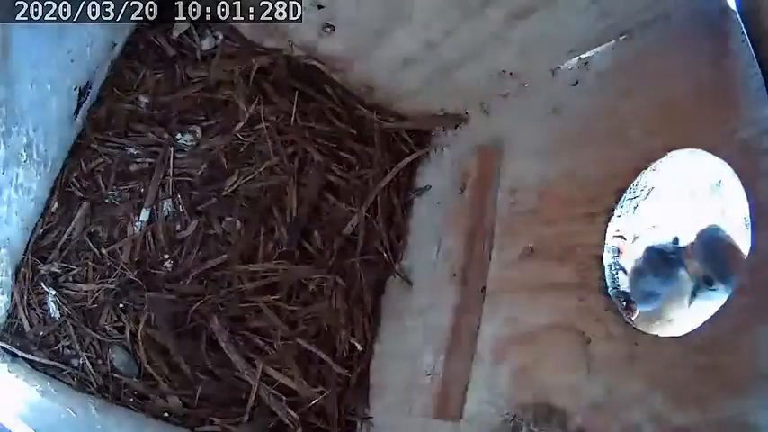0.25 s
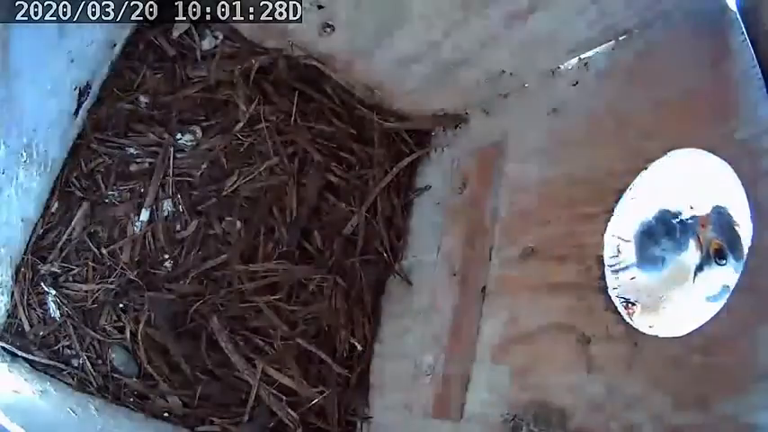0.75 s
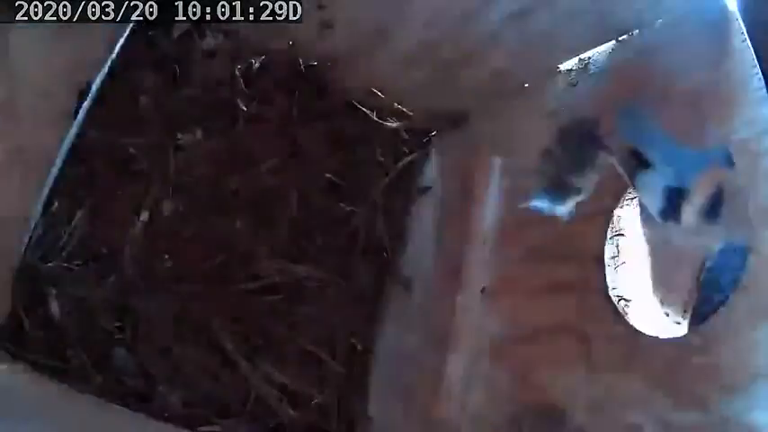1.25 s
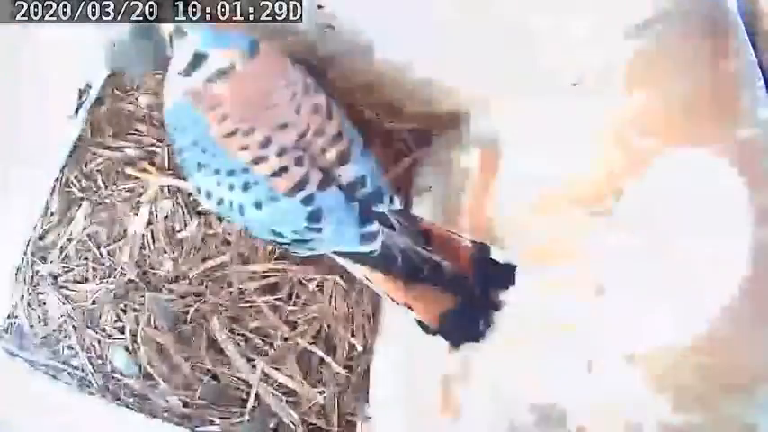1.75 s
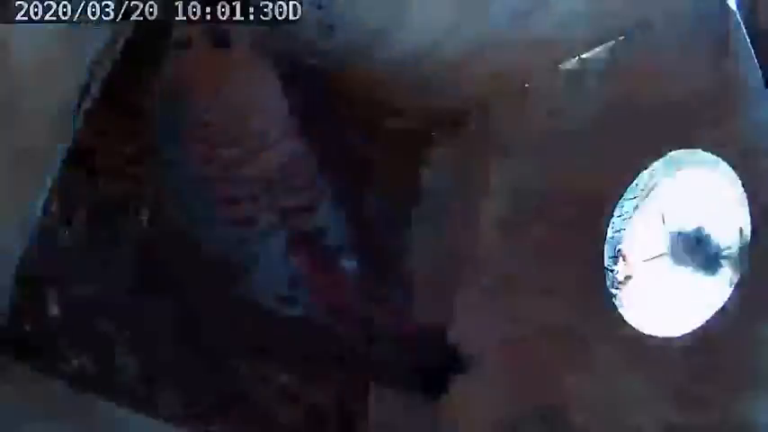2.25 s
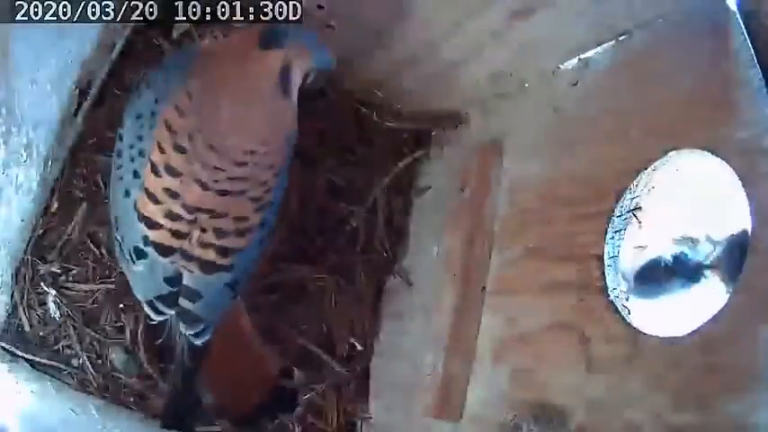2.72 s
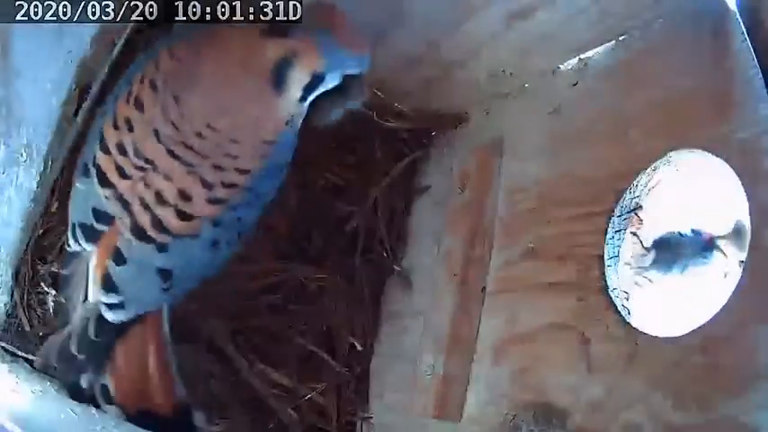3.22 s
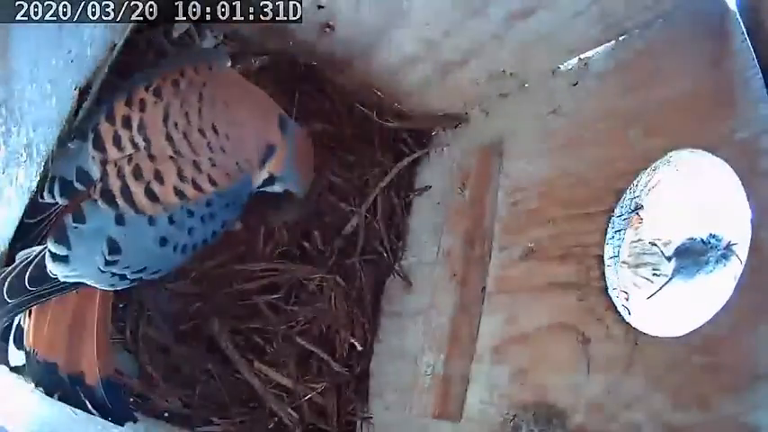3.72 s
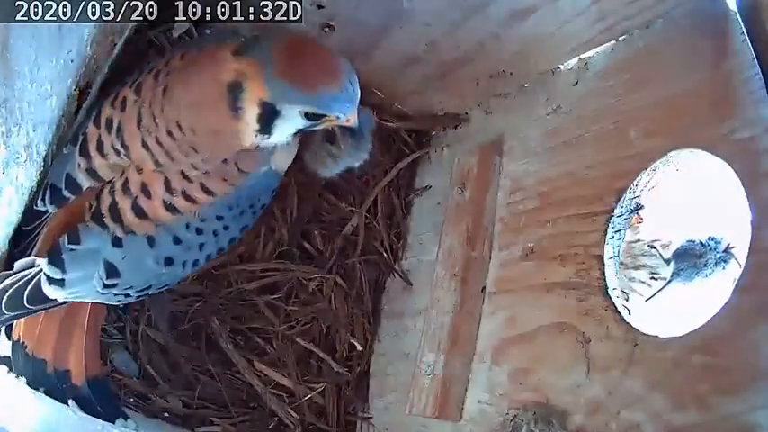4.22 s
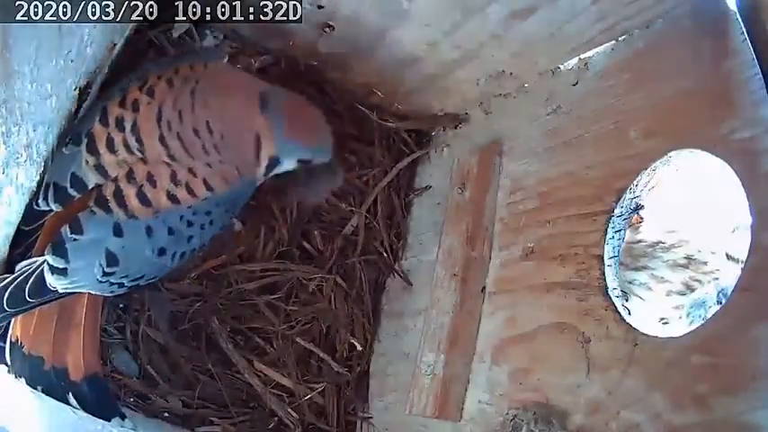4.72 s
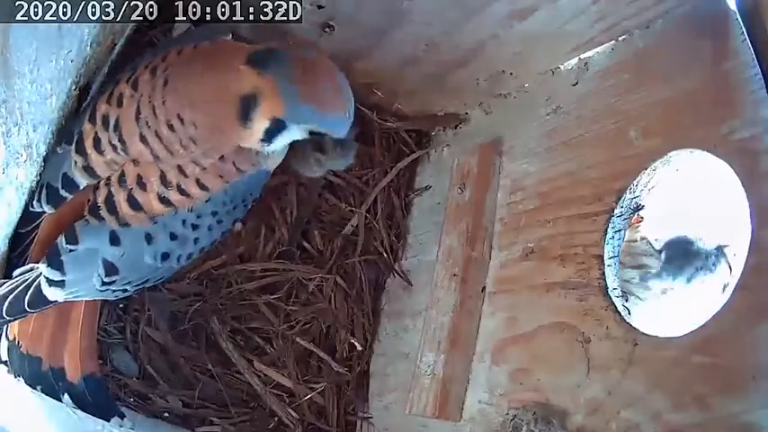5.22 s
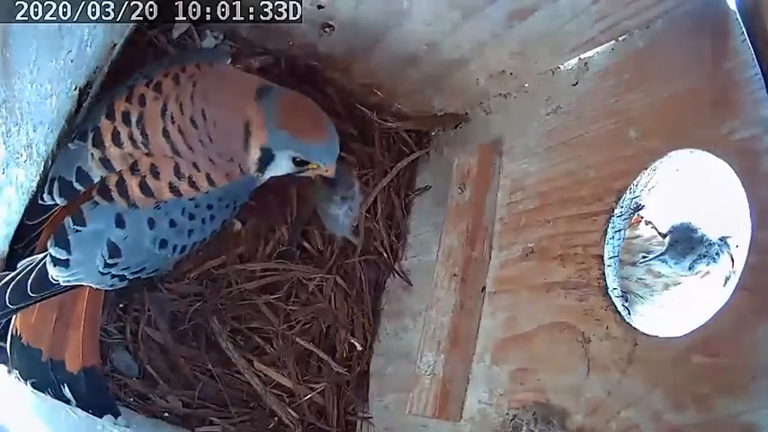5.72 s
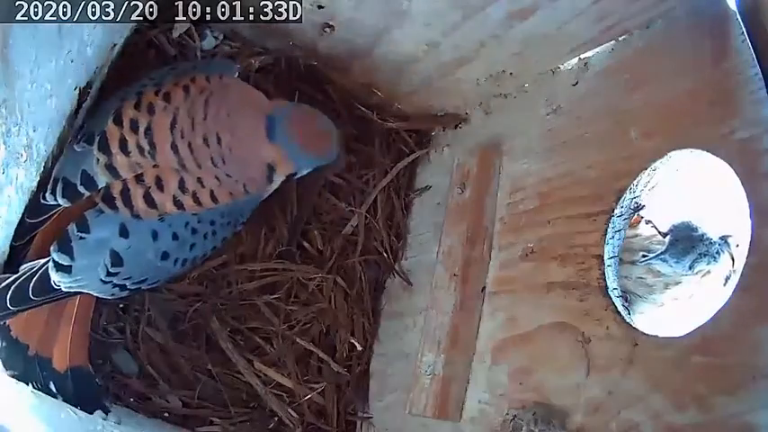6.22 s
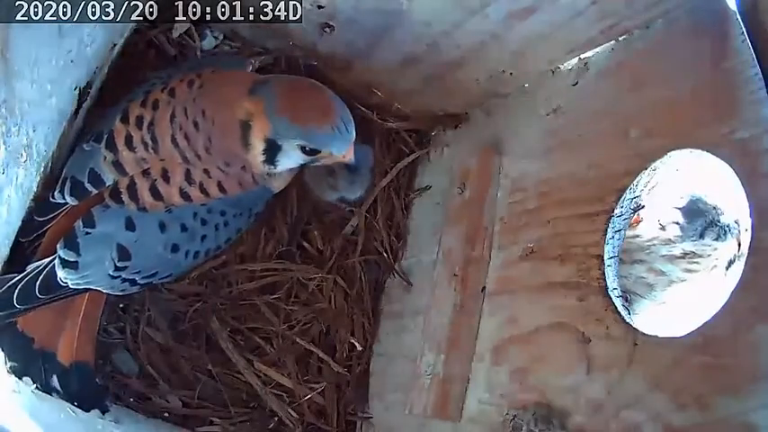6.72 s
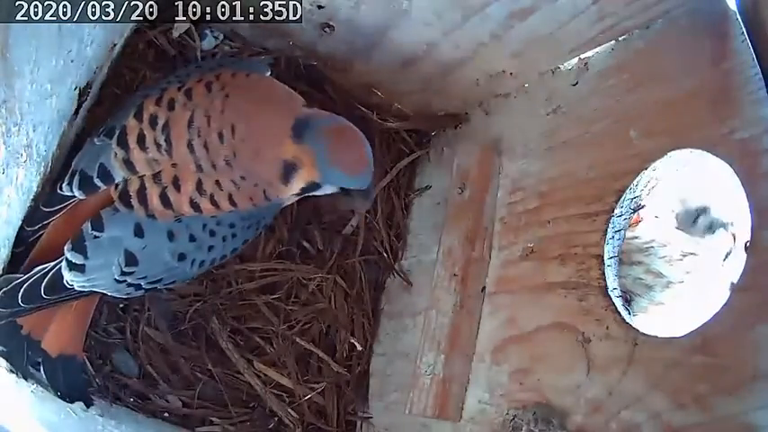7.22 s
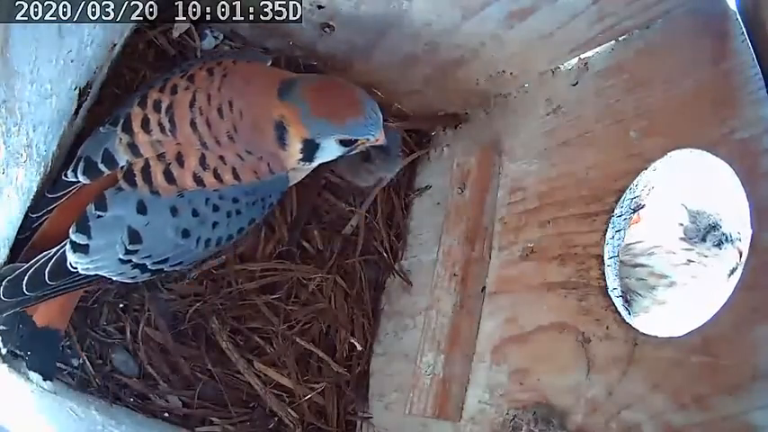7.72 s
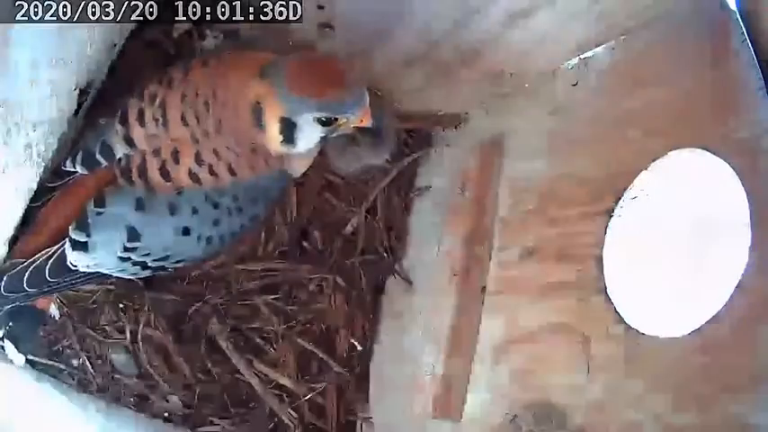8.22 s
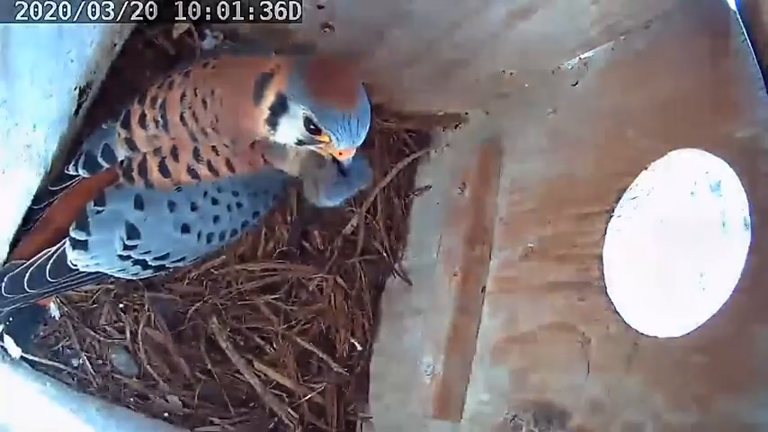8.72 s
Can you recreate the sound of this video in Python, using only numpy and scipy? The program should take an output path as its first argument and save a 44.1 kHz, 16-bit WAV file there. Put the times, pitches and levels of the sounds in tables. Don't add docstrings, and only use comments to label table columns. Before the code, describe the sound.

Two small falcons chatter harshly at a hollow wooden nest box, rapid trills overloading the microphone, with claw scratches over a low hum and hiss.

```python
import sys
import numpy as np
from scipy import signal
from scipy.fft import rfft, irfft
from scipy.io import wavfile
from scipy.ndimage import uniform_filter1d, map_coordinates

SR = 44100
rng = np.random.default_rng(int(sys.argv[2]) if len(sys.argv) > 2 else 0)


def transcribe(signal):
    frames = np.atleast_2d(signal).T
    limited = np.clip(frames, -1, 1)
    pcm = np.round(limited * 32767).astype(np.int16)
    wavfile.write(sys.argv[1], SR, pcm)


def nominal_scale(level):
    x = np.asarray(level, float) / 20
    return 10 ** x


N = 395120

# time in seconds, pitch of the 4th order in Hz,
# its level in dB, engine load as 5th over 4th order in dB.
ENGINE = [(0, 140, -39, 6.5), (.7, 140, -47, 4.5), (1.9, 135, -41, -3.5), (2.2, 136, -23, 5.5),
          (2.55, 137, -36.5, 4.5), (3.5, 141, -30.5, -8), (4.2, 143, -36.5, -9), (4.9, 139, -31.5, -2),
          (5.3, 133, -39, 4), (6.1, 139, -40.5, -16), (6.8, 136, -41.5, -12), (7.3, 139, -35, -24),
          (8.96, 142, -43.5, -5)]
# frequency in Hz, density in dB per Hz.
RUMBLE_COLOUR = [(30, -20.5), (65, -22), (90, -9.5), (200, -8.5), (235, -33), (400, -57.5)]
# time in seconds, level in dB.
RUMBLE_LEVEL = [(0, -38.5), (.7, -51.5), (2.25, -38), (3.8, -54.5), (4.9, -50.5), (6.1, -51), (8.96, -42)]
# frequency in Hz, density in dB per Hz.
HISS_COLOUR = [(150, -27), (260, -9), (417, -5), (556, -6), (795, -7.5), (1830, -17), (3290, -19),
               (8000, -18), (10400, -60.5), (17600, -120)]
# time in seconds, level in dB.
HISS_LEVEL = [(2.6, -46.5), (4, -55.5), (4.6, -50), (5.0, -63), (5.5, -54), (7, -52), (8.96, -53)]
# time in seconds, brightness of the upper harmonics in dB.
BEAK = [(0.1, -0.5), (0.8, -2), (1.15, 0.5), (1.8, -2), (2.1, -7.5), (2.4, 7.5), (2.75, -10.5), (3.0, 3.5),
        (3.4, -9.5), (3.62, 2.5), (3.9, 6), (4.8, 7), (5.4, -0.5), (5.72, 8), (6.24, 0), (6.39, 10),
        (7.33, -1.5), (8.5, 1)]
VOICE_HARMONICS = [-25.5, -2, -2, -0.5]
# time in seconds, level in dB.
MATE_PULSES = [(0.0354, -14), (0.0768, -9), (0.1133, -6.5), (0.155, -3.5), (0.1982, -3), (0.238, -5.5),
               (0.2754, -5), (0.3214, -3.5), (0.3644, -7.5), (0.4054, -5), (0.453, -6), (0.4982, -6),
               (0.5434, -6.5), (0.592, -7), (.64, -12.5), (0.6851, -9), (0.7373, -9), (0.7948, -1.5),
               (0.8439, -1.5), (0.8999, -3.5), (.9439, -5), (0.9939, -3), (1.0437, -1), (1.081, -1),
               (1.1261, -4), (1.1743, -14.5)]
# start in seconds, level in dB, length in seconds, pitch in Hz.
STRAY_NOTES = [
    (0.0909, -17, .016, 2230),
    (2.9373, -7, .014, 2000),
    (3.3588, -7.5, 0.0099, 2060),
    (3.4062, -13.5, .008, 1944),
    (4.0037, -18, 0.0065, 2070),
    (7.5732, -12.5, .006, 2250),
    (0.8272, -7.5, .006, 2055),
]
# start in seconds, peak in dB, time to die by 60 dB in seconds.
SCRATCHES = [(0.086, -10.5, 0.61), (1.535, -27, 0.54), (1.55, -10.5, 0.041), (1.629, -21, 0.2),
             (2.221, -19.5, 0.087), (2.259, -13, 0.12), (4.399, -32, 0.17), (4.888, -53, 0.036),
             (8.047, -21, 0.1), (8.214, -10, 0.048), (8.373, -20.5, 0.17), (8.408, -29, .12),
             (8.872, -26, 0.025), (8.885, -55, 0.071)]
# frequency in Hz, level in dB.
BOARDS = [(300, 10), (900, 1.5), (1700, -6.5), (3000, -5), (5000, -4.5), (7500, -1)]
# start in seconds, end in seconds, level in dB.
FOOT_SHIFTS = [
    (1.175, 1.247, -43.5),
    (2.3, 2.7, -37),
    (8.281, 8.45, -41),
    (8.78, 8.96, -47),
]
# frequency in Hz, density in dB per Hz.
LITTER_COLOUR = [(150, -12), (260, 3), (600, -4.5), (1100, -8.5), (1400, -27)]
# time in seconds, peak in dB.
OUTSIDE_PULSES = [(1.2964, -37), (1.3339, -34), (1.3543, -46), (1.3826, -33), (1.4072, -34), (1.432, -36.5),
                  (1.4551, -37), (1.479, -33), (1.5105, -25.5)]
# opening tick in seconds, number of pulses,
# first gap in seconds, lateness of the last pulse in seconds.
TRILL_RHYTHM = [
    (1.6709, 12, .0356, .0545),
    (2.3467, 7, .0352, .0074),
    (3.5958, 10, .0349, .0323),
    (4.4713, 10, .0333, .0347),
    (5.3663, 11, .0348, .0355),
    (6.2268, 5, .0304, .0216),
    (7.3134, 6, .0334, .017),
    (8.4628, 6, .0366, .01),
]
# first pulse in dB, last pulse in dB, first pitch in Hz, last pitch in Hz.
TRILL_TONE = [(-2, -11, 2350, 1800), (1.5, -6, 2300, 2100), (3.5, -10.5, 2080, 1920), (-1, -9, 2090, 2000),
              (-1.5, -15.5, 2050, 1950), (-4, -5, 2050, 2200), (0, -10, 2050, 1950), (1, -15, 1920, 1880)]
# length in seconds, rise in Hz.
OPENING_TICKS = [(.013, 150), (.006, 100), (.005, 100), (.007, 100), (.007, 140), (.007, 100), (.007, 100),
                 (0.014, 250)]
# start in seconds, number of pairs, first gap in seconds,
# lateness of the last pair in seconds.
CHATTER_RUNS = [
    (2.6161, 12, .0356, .0013),
    (3.0552, 9, .0361, .0396),
    (3.4551, 2, .0494, 0),
]
# time in seconds, level in dB.
CHATTER_EFFORT = [(2.62, -6.5), (2.66, -11), (2.77, -14), (2.85, -6.5), (2.92, -8.5), (3.01, 2), (3.13, -5),
                  (3.3, -13), (3.51, -15.5)]
# time in seconds, pitch in Hz, level in dB.
CLEAR_WHISTLES = [
    [(4.85, 1876, -25.5), (4.955, 1914, -26), (4.992, 1884, -36), (5.015, 1967, -28), (5.028, 1867, -22.5),
     (5.06, 1950, -41)],
    [(5.093, 1930, -22), (5.102, 1840, -19), (5.118, 1850, -29), (5.13, 1920, -24), (5.145, 1780, -36)],
    [(5.312, 1932, -36), (5.32, 2092, -24), (5.345, 2098, -55)],
    [(7.908, 1880, -39.5), (7.917, 1845, -30), (7.93, 1800, -56)],
]
# time in seconds, pitch in Hz, level in dB.
THIN_WARBLE = [
    [(7.99, 3030, -44), (8.022, 3250, -45), (8.06, 3120, -45), (8.1, 3120, -48)],
    [(8.11, 3400, -39), (8.125, 3350, -36.5), (8.17, 3090, -54), (8.21, 3200, -52), (8.245, 3070, -56),
     (8.258, 2930, -23.5), (8.272, 2700, -65)],
]
# start in seconds, end in seconds.
CLEANER_SPANS = [
    (0.649, .97),
    (3.421, 3.6),
]
# start in seconds, end in seconds.
PACKET_GAP = (7.684, 7.798)

UP, DOWN, CAMERA_SR = 441, 160, 16000
TICK_S, LONG_S = .0065, .021
GLIDE_HZ = 110


def in_time(rows):
    s, *columns = np.transpose(rows)
    return [np.interp(np.arange(N) / SR, s, c) for c in columns]


def drift(rate_hz):
    lowpass = signal.butter(2, rate_hz, fs=SR / 20, output="sos")
    slow = signal.sosfilt(lowpass, rng.standard_normal(N // 20 + 2))
    return np.interp(np.arange(N) / 20, np.arange(len(slow)), slow / slow.std())


def coloured(points):
    hz, db = np.transpose(points)
    grid = np.maximum(np.fft.rfftfreq(N, 1 / SR), 1)
    gain = nominal_scale(np.interp(np.log(grid), np.log(hz), db))
    x = irfft(rfft(rng.standard_normal(N)) * gain, N)
    return x / x.std()


def hum():
    hz, fourth_db, load_db = in_time(ENGINE)
    rumble_db, = in_time(RUMBLE_LEVEL)
    turn = 2 * np.pi * np.cumsum(hz * (1 + 0.0089 * drift(8))) / 4 / SR
    tones = np.zeros(N)
    for order, db in [(3, fourth_db - 12), (4, fourth_db), (5, fourth_db + load_db)]:
        tones += np.sqrt(2) * nominal_scale(db + 2.5 * drift(6)) * np.sin(order * turn)
    return tones + nominal_scale(rumble_db + 9.5) * coloured(RUMBLE_COLOUR)


def hiss():
    level_db, = in_time(HISS_LEVEL)
    return nominal_scale(level_db + drift(12)) * coloured(HISS_COLOUR)


def tick(s, db, hz):
    glide = .7 * (hz - 2020)
    return s, db + 0.45 * max(db + 11.0, 0), .0055, hz - glide, hz + glide


def close_pulse(s, db, length, start_hz, end_hz):
    return s + .001, db + 2.5, .88 * length, start_hz, end_hz


def mate():
    notes = []
    for s, db in MATE_PULSES:
        grace_db = -10 + 0.43 * (db + 3) + rng.uniform(-0.13, 1)
        notes.append(tick(s - .0205, grace_db, 2091))
        end_hz = (.96 + .015 * rng.standard_normal()) * 2072
        notes.append((s, db + 1.5, .9 * .0115, 1.12 * 2072, end_hz))
    return notes


def bird_voice(notes, rise_s=.0015, fall_s=0.0028):
    level, pitch = np.zeros(N), np.full(N, 2000.)
    for s, db, length, start_hz, end_hz in sorted(notes):
        t = np.arange(-rise_s, length + 8 * fall_s, 1 / SR)
        attack = np.clip(t / rise_s + 1, 0, 3) / 3
        shape = attack * np.exp(-np.maximum(t - length + fall_s, 0) / fall_s)
        i = max(round((s - rise_s) * SR), 0)
        level[i:i + len(t)] = np.maximum(level[i:i + len(t)], nominal_scale(db + 2.0) * shape)
        sag = .07 * length / .02 * (np.sin(np.pi * np.clip(t / length, 0, 1)) - .6)
        glide = np.interp(t, [.1 * length, .9 * length], [start_hz, end_hz])
        pitch[i:i + len(t)] = (1 - sag) * glide
    phase = 2 * np.pi * np.cumsum(pitch * (1 + .025 * drift(150))) / SR

    bright_db, = in_time(BEAK)
    stack, power = np.zeros(N), np.zeros(N)
    for k, (db, share) in enumerate(zip(VOICE_HARMONICS, [-1.4, -0.73, -.3, 1.0])):
        gain = nominal_scale(db + share * bright_db + 5.5 * drift(90))
        stack += gain * np.sin((k + 1) * phase + k)
        power += gain ** 2
    stack *= np.sqrt(2 / power)

    breath = signal.butter(2, [2300, 7600], "band", fs=SR, output="sos")
    air = signal.sosfilt(breath, rng.standard_normal(N))
    effort = np.minimum(level, 1)
    rasp = nominal_scale(-4) * effort ** .5 * air * (1 + np.cos(phase))
    between_gain = nominal_scale(-16.5 - 0.54 * bright_db + 3.7 * drift(130))
    between = between_gain * uniform_filter1d(effort, 900) * np.sin(phase)
    return between + level * (stack + rasp)


def claws():
    level = np.zeros(N)
    for s, db, t60 in SCRATCHES:
        t = np.arange(N - round(s * SR)) / SR
        level[-len(t):] += nominal_scale(db - 0.5 - 60 * t / t60) * np.minimum(t / 0.0045, 1)
    return level * nominal_scale(1.0 * drift(240)) * coloured([(60, -22.5)] + list(BOARDS))


def strays():
    return [(s, db, length, 1.02 * hz, hz) for s, db, length, hz in STRAY_NOTES]


def shuffle():
    t = np.arange(N) / SR
    level = np.zeros(N)
    for start, end, db in FOOT_SHIFTS:
        level += nominal_scale(db) * np.clip(np.minimum(t - start, end + 0.071 - t) / 0.021, 0, 1)
    return level * nominal_scale(7.6 * drift(30)) * coloured(LITTER_COLOUR)


def mate_outside():
    return [tick(s, db - 7.0, 1950 + 120 * (-1) ** k) for k, (s, db) in enumerate(OUTSIDE_PULSES)]


def beats(start, count, gap, late, power):
    place = np.arange(count) / (count - 1)
    return start + gap * np.arange(count) + late * place ** power, place


def near_bird():
    notes = []
    tired_gap_s = (.0375, .046)
    for rhythm, tone, opening in zip(TRILL_RHYTHM, TRILL_TONE, OPENING_TICKS):
        lead, count, first_gap, late = rhythm
        first_db, last_db, first_hz, last_hz = tone
        lead_s, rise_hz = opening
        s, place = beats(lead + .023, count, first_gap, late, power=4)
        gap = np.diff(s, prepend=s[0] - first_gap)
        db = first_db + (last_db - first_db) * place ** 1.5
        db = db + 3 * (place == 0) + 3.5 * rng.uniform(-0.83, 1, len(s))
        hz = first_hz + (last_hz - first_hz) * place
        glide = GLIDE_HZ * (1 - 2 * place)
        length = np.interp(gap, tired_gap_s, [LONG_S, TICK_S])
        notes += [close_pulse(*pulse) for pulse in zip(s, db, length, hz - glide, hz + glide)]
        lead_db = -4 - 3.0 + 300 * (lead_s - TICK_S)
        notes.append(close_pulse(lead - .001, lead_db, lead_s, 2182 - rise_hz, 2182 + rise_hz))
        notes += [tick(t - .021, -15.5, 2060) for t in s[gap > np.mean(tired_gap_s) - .002]]
    return notes


def chatter(call_hz=1930, answer_hz=2055, join_db=-6.5):
    notes = []
    for run in CHATTER_RUNS:
        s, _ = beats(*run, power=2)
        effort_db = np.interp(s, *np.transpose(CHATTER_EFFORT))
        for t, gap, db in zip(s, np.diff(s, append=s[-1] + .055), effort_db):
            notes.append(tick(t, db, call_hz))
            notes.append(tick(t + .41 * gap, db + 3, answer_hz))
            if db > join_db:
                length = min(TICK_S + 0.16 * (db - join_db), .025)
                notes.append(close_pulse(t, db - 7.5, length, 1.03 * answer_hz, answer_hz))
    return notes


def whistles(notes, colour_db, opens):
    out, t = np.zeros(N), np.arange(N) / SR
    wavers_db = [2.6 * drift(32) for _ in colour_db]
    for note in notes:
        pitch, level_db = in_time(note)
        phase = 2 * np.pi * np.cumsum(pitch * (1 + .002 * drift(60))) / SR
        sounding = np.clip(np.minimum(t - note[0][0], note[-1][0] - t) / 0.0019, 0, 1)
        for k, (db, share, waver_db) in enumerate(zip(colour_db, opens, wavers_db)):
            harmonic_db = level_db + db + share * (level_db + 18.5) + waver_db
            out += sounding * np.sqrt(2) * nominal_scale(harmonic_db) * np.sin((k + 1) * phase)
    return out


def box(x):
    count = round(.03 * SR)
    bounces = rng.standard_normal(count) * nominal_scale(-60 * np.arange(count) / SR / 0.043)
    bounces /= np.sqrt(np.sum(bounces ** 2))
    return x + nominal_scale(-12) * signal.fftconvolve(x, bounces)[:N]


def smear(x, size, frames, bins, flat):
    overlap = size * 3 // 4
    power = np.abs(signal.stft(x, nperseg=size, noverlap=overlap)[2]) ** 2
    treble = np.clip(np.linspace(-.6, 5.0, len(power)), 0, 1)[:, None]
    power = (1 - flat) * power + flat * power.mean(axis=0) * treble
    fade = np.hanning(2 * frames + 1)[frames:] / frames
    power = signal.lfilter(fade, 1, uniform_filter1d(power, bins, axis=0), axis=1)
    white = signal.stft(rng.standard_normal(len(x)), nperseg=size, noverlap=overlap)[2]
    white = white / np.sqrt(np.mean(np.abs(white) ** 2))
    return signal.istft(np.sqrt(np.abs(power)) * white, nperseg=size, noverlap=overlap)[1][:len(x)]


def streaked(x, size=12):
    frames = signal.stft(x, nperseg=1024)[2]
    chance_db = 5.0 * rng.standard_normal((len(frames) // size + 1, frames.shape[1]))
    gain = nominal_scale(np.repeat(chance_db, size, axis=0)[:len(frames)] - 2.5)
    return signal.istft(frames * gain, nperseg=1024)[1][:len(x)]


def starved(x, size=12):
    frames = signal.stft(x, nperseg=768)[2]
    bands = frames[:-1].reshape(-1, size, frames.shape[1])
    band_db = 10 * np.log10(np.mean(np.abs(bands) ** 2, axis=1) + 1e-20)
    scatter_db = 12.0 * uniform_filter1d(rng.standard_normal(band_db.shape), size=3, axis=1)
    dropped = band_db - band_db[1:].max(axis=0) < -33 + scatter_db
    unlucky = uniform_filter1d(rng.random(band_db.shape), size=3, axis=1) < .22
    dropped |= unlucky & (band_db < band_db.max(axis=0) - 14)
    dropped[0] = False
    frames[:-1] *= np.repeat(np.where(dropped, nominal_scale(-32.5), 1), size, axis=0)
    return signal.istft(frames, nperseg=768)[1][:len(x)]


def scene():
    pulses = bird_voice(mate() + strays() + mate_outside() + near_bird() + chatter())
    clear = whistles(CLEAR_WHISTLES, [-2.5, -4.5, -3.5, -6.5], [0, .2, .3, 1.2])
    warble = whistles(THIN_WARBLE, [0.5, -24], [0, -1])
    air = box(pulses + clear + warble + claws()) + hum() + hiss() + shuffle()
    return np.array([air, air])


def band_limit(x):
    return signal.sosfilt(signal.butter(12, 20000, fs=SR, output="sos"), x)


def record(dry):
    t = np.arange(N) / SR
    heard = signal.sosfilt(signal.cheby2(8, 50, 10000, fs=SR, output="sos"), dry[0])
    slow = map_coordinates(heard, [np.arange(N * DOWN // UP) * UP / DOWN])
    slow = np.clip(slow, -.8, .8)

    strain = np.clip(uniform_filter1d(np.abs(slow), 64) / 0.27, 0, 1)
    for start, end in CLEANER_SPANS:
        strain[round(start * CAMERA_SR):round(end * CAMERA_SR)] *= nominal_scale(-18)
    haze = streaked(smear(strain * slow, size=128, frames=44, bins=9, flat=0.19))
    slow = starved(slow + nominal_scale(-5.0) * np.roll(haze, -70))

    smooth = signal.firwin(80 * UP + 1, 8150 / (CAMERA_SR * UP / 2), window=("kaiser", 8))
    mono = signal.resample_poly(slow, UP, DOWN, window=smooth)
    gap_start, gap_end = PACKET_GAP
    mono = np.pad(mono, (0, UP))[:N] * np.clip(np.maximum(gap_start - t, t - gap_end) / 0.0016, 0, 1)
    mono = signal.sosfilt(signal.butter(2, 30, "high", fs=SR, output="sos"), np.clip(mono, -.9, .9))

    loud = np.clip(uniform_filter1d(np.abs(mono), 1024) / 0.36, 0, 1) ** 2
    above = signal.cheby2(10, 40, 3700, "high", fs=SR, output="sos")
    noise = signal.sosfilt(above, loud * smear(mono, size=256, frames=2, bins=5, flat=0))
    side = nominal_scale(-3.0 + 3.0 * drift(12)) * noise
    clipped = np.clip([mono + side, mono - side], -.97, .97)
    mix = signal.sosfilt(signal.cheby2(10, 14, 15700, fs=SR, output="sos"), clipped)
    return band_limit(mix)


dry = scene()
out = record(dry)
transcribe(out)
```